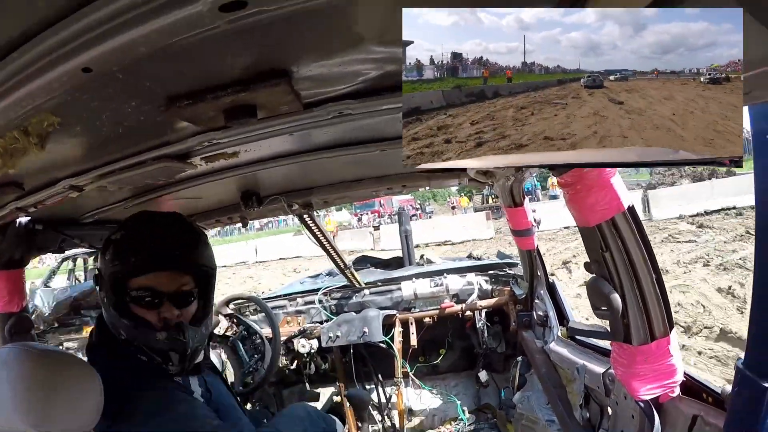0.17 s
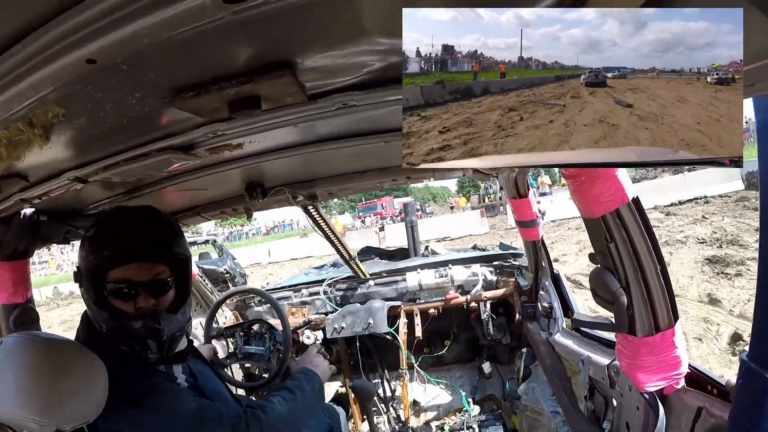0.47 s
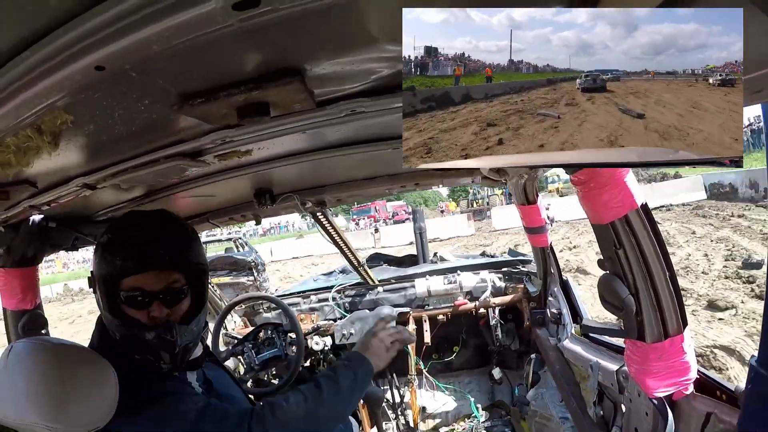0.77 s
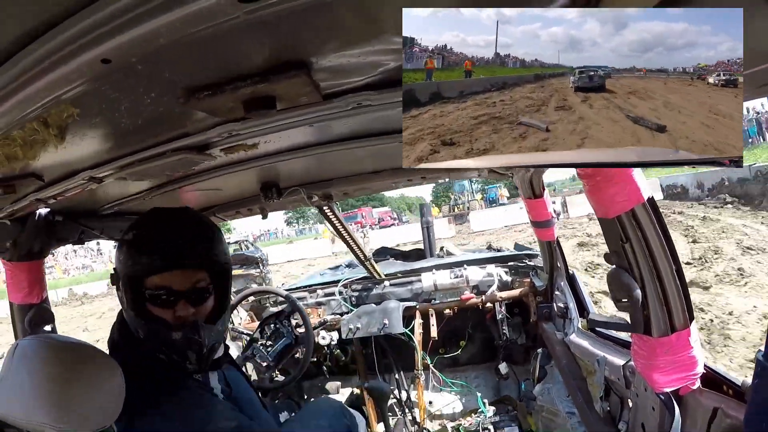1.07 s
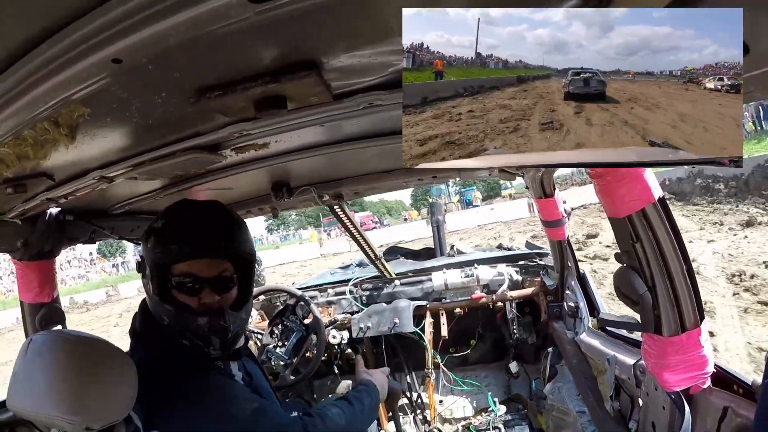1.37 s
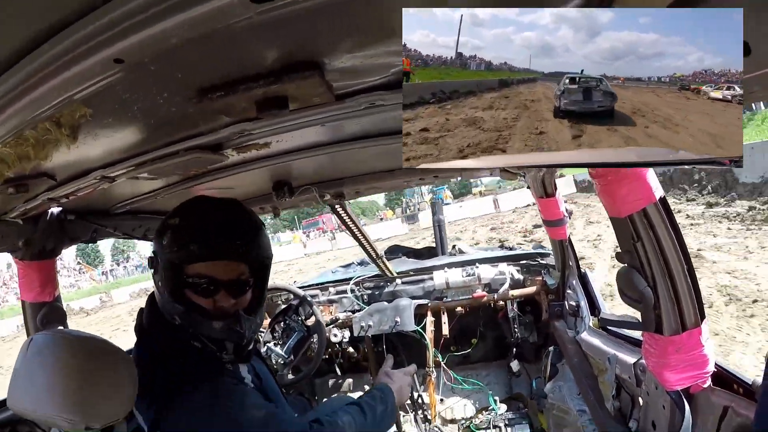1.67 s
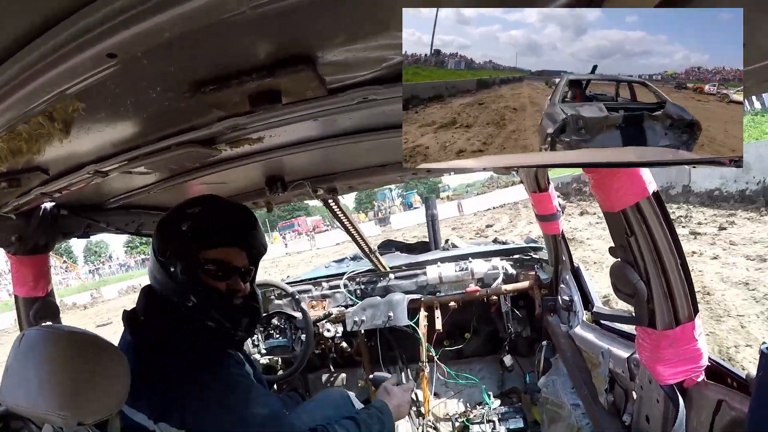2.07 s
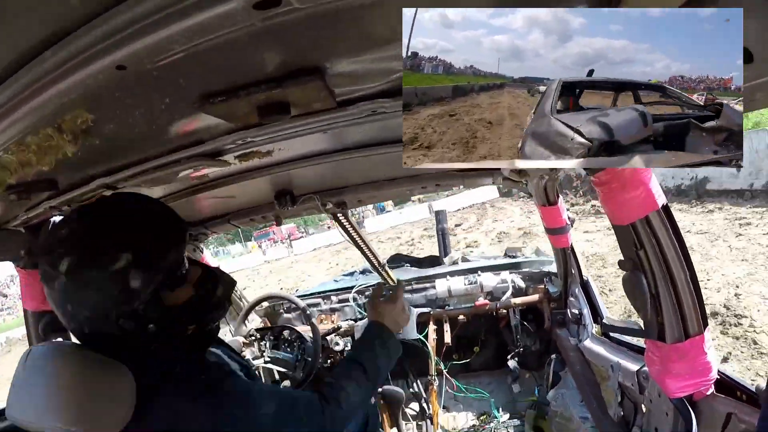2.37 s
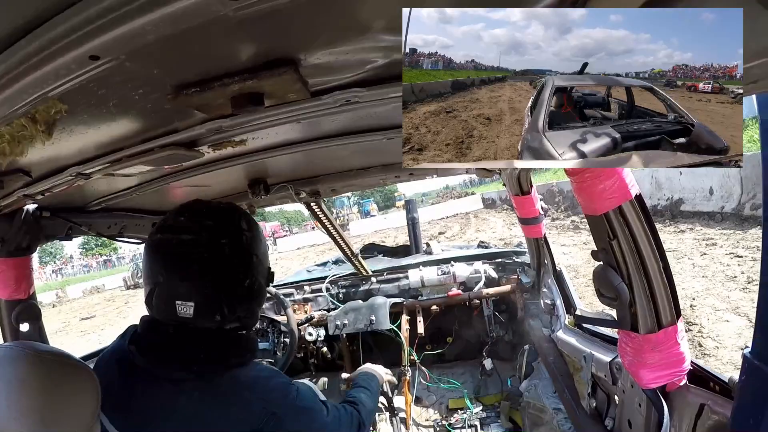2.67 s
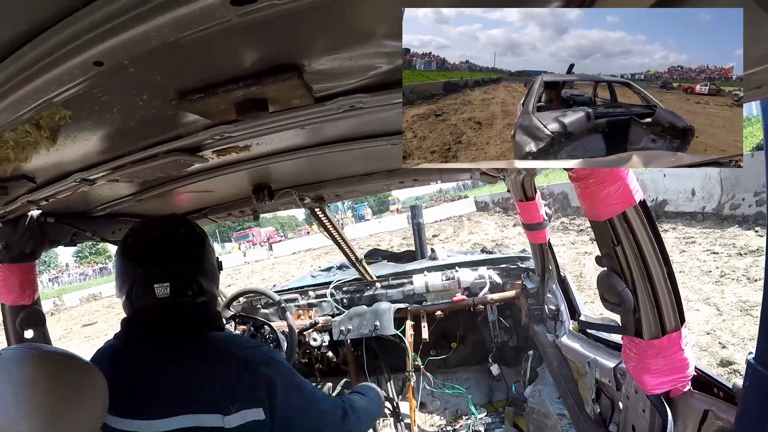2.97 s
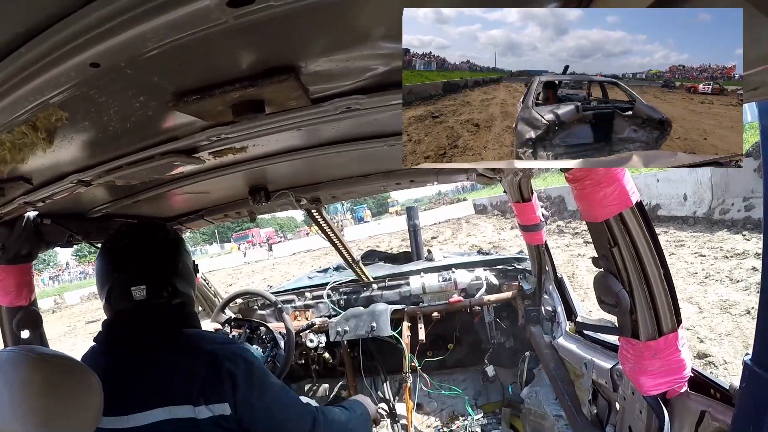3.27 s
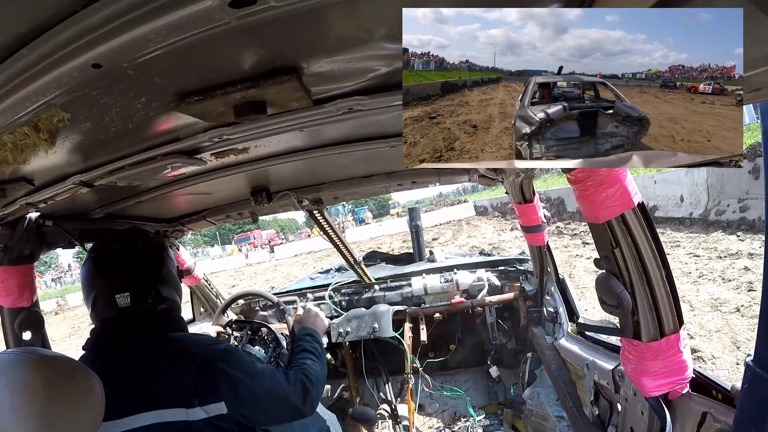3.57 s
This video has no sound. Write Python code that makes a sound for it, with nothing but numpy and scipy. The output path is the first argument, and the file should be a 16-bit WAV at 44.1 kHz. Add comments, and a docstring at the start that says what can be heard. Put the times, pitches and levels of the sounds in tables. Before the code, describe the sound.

A derby car engine revs hard, eases off, then rams another car with a crunching metal crash.

```python
"""Ramming in a stripped derby car

Heard from the cabin on a dirt arena: the engine barks under throttle, eases off, the car rams another
and pulls again. Pulses, pitched orders and puffs of noise on one firing cycle make the engine; orders
alone make two other cars. Filtered noise and random ticks make the booming, rattling shell and dirt.
The crash is decaying bursts of snaps and noise ringing the panels, a low thud, then settling parts."""
import sys
import numpy as np
from scipy import signal
from scipy.fft import rfft, irfft, next_fast_len
from scipy.io import wavfile
from scipy.ndimage import uniform_filter1d, minimum_filter1d, map_coordinates

SR = 44100
rng = np.random.default_rng(int(sys.argv[2]) if len(sys.argv) > 2 else 0)


def wav_record(signal):
    """Record a signal, one row per channel, as 16-bit PCM in the file named by sys.argv[1]."""
    frames = np.transpose(np.atleast_2d(signal))
    bounded = np.clip(frames, -1, 1)
    # unit amplitude maps onto the largest positive 16-bit level
    quanta = np.round(bounded * 32767).astype(np.int16)
    wavfile.write(sys.argv[1], SR, quanta)


N = 163611


def amp(db):
    """Level to gain: 20 dB is a factor of ten in amplitude."""
    return 10 ** (np.asarray(db) / 20)


def unit(x):
    """Normalisation: the signal scaled to rms 1."""
    return x / np.sqrt(np.mean(x ** 2) + 1e-20)


def along(points, hz):
    """Spectral envelope: (f/Hz, value) points joined by lines on a log frequency axis."""
    f, v = np.transpose(points)
    return np.interp(np.log(hz + 1), np.log(f + 1), v)


def curves(rows):
    """Linear interpolation in time: a value per sample for each column after t/s."""
    s, *cols = np.transpose(rows)
    return [np.interp(np.arange(N) / SR, s, c) for c in cols]


def wobble(rate):
    """Slow random modulation: a smooth curve through random knots, rate of them a second."""
    return map_coordinates(rng.standard_normal(2048), [np.arange(N) * rate / SR], mode="wrap")


def filtered(x, response):
    """Linear filtering: the spectrum times a complex response of frequency."""
    m = next_fast_len(N + SR // 2)
    spectrum = rfft(x, m) * response(np.fft.rfftfreq(m, 1 / SR))
    return irfft(spectrum, m)[..., :N]


def coloured(x, points):
    """Minimum-phase filtering: a causal filter with the given (f/Hz, level/dB) shape."""
    size = 16384
    cepstrum = irfft(np.log(amp(along(points, np.fft.rfftfreq(size, 1 / SR)))))
    # folding the cepstrum onto positive times makes the response causal
    cepstrum[1:size // 2] *= 2
    cepstrum[size // 2 + 1:] = 0
    impulse = irfft(np.exp(rfft(cepstrum)))[:size // 2]
    return signal.fftconvolve(x, impulse)[:N]


def resonant(x, modes):
    """Modal resonance: parallel second-order modes of (f/Hz, width/Hz, peak gain/dB)."""
    def response(f):
        return sum(amp(db) * 1j * f * w / (c * c - f * f + 1j * f * w) for c, w, db in modes)
    return filtered(x, response)


def ticks(per_s, spread_db):
    """Random impact process: sparse impulses of uneven size and random sign, rms 1."""
    size = amp(spread_db * np.minimum(rng.exponential(size=N), 4))
    happens = rng.random(N) < per_s / SR
    return unit(happens * size * np.sign(rng.standard_normal(N)))


def orders(hz, table, rough, flutter_hz):
    """Order synthesis: sines at multiples of a pitch curve, each wavering in size and phase."""
    turn = 2 * np.pi * np.cumsum(hz) / SR
    total = 0
    for k, db in table:
        level = amp(db + 2.2 * rough * wobble(flutter_hz))
        phase = k * turn + rng.uniform(0, 2 * np.pi) + rough * k * wobble(flutter_hz)
        total = total + level * np.sin(phase)
    return np.sqrt(2) * total


def bursts(rows):
    """Impact envelope: (t/s, level/dB, T60/s) hits, at once up and exponentially down, summed in power."""
    t = np.arange(N) / SR
    return np.sqrt(sum((t >= s) * amp(db - 60 * np.abs(t - s) / t60) ** 2 for s, db, t60 in rows))


def shell():
    """Forced vibration: ruts shake a deep rumble from the body, with dirt and loose parts clattering."""
    # shaking over the ruts: t/s, rumble level/dB, clatter level/dB
    ground = [(0, -14, -29.5), (.2, -18, -28.5), (.5, -12.5, -27.5), (1.0, -18, -24), (1.5, -15.5, -25.5),
              (1.9, -16.5, -27.5), (2.2, -16.5, -29.5), (2.5, -15.5, -31), (2.8, -15.5, -35),
              (3.1, -17.5, -32.5), (3.4, -22.5, -27.5), (3.71, -12.5, -39.5)]
    # spectrum of the booming body: f/Hz, relative level/dB
    rumble_shape = [(15, -43), (30, -1.5), (48, -1), (65, 9), (82, 8.5), (100, 12), (125, 10.5), (155, 2.5),
                    (190, -0.5), (260, -10.5), (500, -74.5)]
    # spectrum of the loose parts: f/Hz, relative level/dB
    clatter_shape = [(100, -24.5), (220, 3), (450, -0.5), (620, -7), (950, -10.5), (1600, -12),
                     (2500, -18.5), (4500, -33.5), (9000, -70)]
    rumble_db, clatter_db = curves(ground)
    rumble = unit(coloured(rng.standard_normal(N), rumble_shape))
    rattle_share = 0.46  # rms of the ticks against the noise
    strikes = rng.standard_normal(N) + rattle_share * ticks(per_s=600, spread_db=5)
    unsteady = strikes * amp(2.23 * wobble(45))
    clatter = unit(coloured(unsteady, clatter_shape))
    return amp(rumble_db) * rumble + amp(clatter_db) * clatter


def dirt_spray():
    """Dense random impacts: dirt spraying on the steel merges into a wavering hiss."""
    # strength of the spray: t/s, level/dB before wavering
    spray = [(.3, -71), (1.4, -53.5), (1.75, -47), (2.05, -52.5), (2.45, -44.5), (2.75, -52.5),
             (3.2, -52.5), (3.5, -44), (3.71, -45.5)]
    # spectrum of grit on steel: f/Hz, relative level/dB
    grit_shape = [(1000, -20.5), (3000, 22), (5000, 12), (6800, 17.5), (9000, -33.5)]
    spray_db, = curves(spray)
    hiss = unit(coloured(rng.standard_normal(N), grit_shape))
    return amp(spray_db + 3.9 * wobble(15)) * hiss


def shell_groans():
    """Brief tonal vibration: the twisting shell groans in sines under Gaussian swells."""
    # groans of the shell: t/s of the peak, f/Hz, peak level/dB
    groan_list = [(0.064, 570, -31), (0.581, 425, -13), (.925, 470, -18), (.945, 695, -19.5),
                  (1.38, 705, -26), (1.43, 478, -17.5), (1.601, 590, -26), (1.68, 460, -18),
                  (1.77, 455, -18), (1.945, 373.9, -23)]
    width_s = 0.019  # standard deviation of each swell
    t = np.arange(N) / SR
    total = np.zeros(N)
    for s, hz, db in groan_list:
        swell = np.exp(-((t - s) / width_s) ** 2 / 2)
        total += amp(db) * swell * np.sin(2 * np.pi * hz * t + .5 * wobble(70))
    return total


def tyres():
    """Friction noise: tyres scrub as the cars part, a short Gaussian swell of narrow-band noise."""
    centre_s, width_s, level_db = 3.32, 0.14, -53.5  # peak level of the swell
    swell = np.exp(-((np.arange(N) / SR - centre_s) / width_s) ** 2 / 2)
    scrub = unit(resonant(rng.standard_normal(N), [(1430, 400, 0)]))
    return amp(level_db) * swell * scrub


def rival_car():
    """Harmonic radiation: the engine of the car ahead, heard as orders of its firing rate."""
    # engine of the car ahead: t/s, firing rate f/Hz, level/dB
    rival = [(1.3, 61.02, -65), (1.5, 63.06, -29.5), (1.7, 70.5, -33.5), (1.9, 73.84, -32),
             (2.1, 75.39, -35), (2.5, 68.16, -39.5), (2.9, 78.66, -44), (3.5, 82.2, -38.5),
             (3.71, 77.14, -41.5)]
    # its orders: multiple of the firing rate, relative level/dB
    rival_orders = [(2, 13), (3, -20), (4, 2.5), (6, -8), (7, -10.5)]
    hz, level_db = curves(rival)
    return amp(level_db) * orders(hz, rival_orders, rough=.13, flutter_hz=21.76)


def droning_car():
    """Low-order transmission: the nearest other engine booms in the shell, with weaker overtones."""
    # boom of the nearest other engine: t/s, pitch f/Hz, level/dB
    drone = [(0, 88.8, -23), (.08, 94.3, -11.5), (.18, 104.2, -9), (.24, 104, -10), (.28, 101.1, -16),
             (.35, 99.5, -9.5), (.46, 96.6, -24.5), (.8, 110, -22), (1.2, 97.93, -16), (1.36, 113.3, -14.5),
             (1.49, 129.9, -9.5), (1.58, 100.5, -15), (1.7, 106.9, -12.5), (1.82, 120.6, -17.5),
             (2.14, 98.1, -17), (2.26, 116.7, -6.5), (2.38, 112.5, -27.5), (2.55, 103.2, -18),
             (2.78, 120.8, -15), (3.15, 119, -21), (3.3, 115.5, -14), (3.44, 112.1, -8), (3.55, 111, -13),
             (3.71, 109.3, -18.5)]
    # its overtones: multiple of the pitch, level/dB relative to the boom before the edge is added
    overtone_orders = [(1.249, -21), (2, -13), (2.5, -23.5), (3, -23.5), (4, -26)]
    # edge on the overtones: t/s, added level/dB
    edge = [(0, 5), (.15, 1.5), (.4, 5), (1.5, -11), (2.6, -12), (3.2, -13.5), (3.5, -2), (3.71, 4.5)]
    hz, level_db = curves(drone)
    edge_db, = curves(edge)
    boom = orders(hz, [(0.99, 0.0038)], rough=0.069, flutter_hz=34.16)
    overtones = orders(hz, overtone_orders, rough=0.35, flutter_hz=30.16)
    return amp(level_db) * (boom + amp(edge_db) * overtones)


def engine():
    """Periodic excitation: each firing sends a pulse down the exhaust and rasping gas into the shell."""
    # the car's own engine: t/s, firing rate f/Hz
    firing = [(0, 54.8), (.36, 55.41), (.48, 63.5), (.62, 73.1), (.75, 77.73), (.87, 77.73), (1.03, 74.3),
              (1.25, 73.76), (1.38, 70.7), (1.52, 62.81), (1.83, 61.73), (2.2, 56.75), (2.5, 52.08),
              (3.3, 53.8), (3.71, 52.96)]
    # throttle: t/s, exhaust level/dB, rasp level/dB
    throttle = [(0, -25.5, -89.5), (.29, -26, -49.5), (.36, -20.5, -27.5), (.55, -18, -26),
                (.75, -17.5, -23), (1.0, -15, -27), (1.28, -20.5, -27.5), (1.4, -24, -38.5),
                (1.75, -22, -34), (1.88, -24.5, -63.5), (2.2, -22, -40.5), (2.8, -48, -60),
                (3.3, -43.5, -44), (3.53, -35.5, -33.5), (3.71, -33, -24.5)]
    # exhaust heard through the shell: f/Hz, relative level/dB
    exhaust_shape = [(30, -35.5), (75, -8), (155, 10), (228, -4), (300, -7), (445, 10.5), (540, -13.5),
                     (640, -8), (900, -3), (1100, -28), (5000, -66)]
    # spectrum of the rasping gas: f/Hz, relative level/dB
    rasp_shape = [(400, -20), (800, 3.5), (1050, -7), (1600, -2), (2300, -4.5), (2800, -8), (3500, -6.5),
                  (4800, -12.5), (7000, -13.5), (9000, -21.5), (11000, -39), (15000, -27.5)]
    # pipe resonances: f/Hz, width/Hz, relative gain/dB
    pipe_modes = [(905, 17, 7), (1593, 54, 3.5), (2219, 65, 3.5), (2463, 30, -5.5), (3080, 220, -17)]
    # clean orders: multiple of the firing rate, relative level/dB
    clean_orders = [(1, 2), (1.5, -4), (2, -1), (3, -1.5), (5, -7), (6, -5), (7, -11.5), (8, -12),
                    (9, -12.5), (12, -10), (2.5, -16.5), (5.5, -12.5), (8.5, -10)]
    cylinder_swing, firing_scatter_db, jitter_s = 0.24, 1, .00006
    puff_decay, puff_floor, puff_scatter_db = .24, .5, 1.2  # decay to 1/e in firing cycles
    crack_decay, crack_scatter_db, crack_db = .17, 1, -2.5  # decay to 1/e in firing cycles
    surge_db, surge_hz = 2.27, 35.56  # uneven burning
    ring_from_hz, ring_full_hz = 43, 61.8  # firing rates over which the puffs start to ring the pipe

    hz, = curves(firing)
    exhaust_db, rasp_db = curves(throttle)
    cycle = np.cumsum(hz * (1 + 0.0024 * wobble(25))) / SR
    index = cycle.astype(int)
    since_firing = cycle % 1
    at = np.flatnonzero(np.diff(index))
    # one row a firing: lateness, pulse size, puff size
    chance = rng.standard_normal((512, 3))
    # alternate firings are stronger and weaker
    swing = 1 + cylinder_swing * (-1) ** np.arange(len(chance))

    pulses = np.zeros(N)
    late = (jitter_s * SR * chance[:len(at), 0]).astype(int)
    pulse_size = swing * amp(firing_scatter_db * chance[:, 1])
    pulses[np.clip(at + late, 0, N - 1)] = pulse_size[:len(at)]
    exhaust = unit(coloured(pulses - pulses.mean(), exhaust_shape))

    # decaying puffs over a steady hiss
    puff_size = swing * amp(puff_scatter_db * chance[:, 2])
    puff = np.exp(-since_firing / puff_decay) * puff_size[index]
    flow = (puff + puff_floor) * amp(surge_db * wobble(surge_hz))
    gas = coloured(flow * rng.standard_normal(N), rasp_shape)

    # the steep front of each puff cracks against the pipe's resonances
    front = np.exp(-since_firing / crack_decay) * amp(crack_scatter_db * chance[:, 2])[index]
    ring = resonant(coloured(front * rng.standard_normal(N), rasp_shape), pipe_modes)
    ringing = np.clip((hz - ring_from_hz) / (ring_full_hz - ring_from_hz), 0, 1)
    rasp = unit(unit(gas) + amp(crack_db) * ringing * unit(ring))

    # the clean orders strengthen with the ringing
    tone = (0.48 + 0.54 * ringing) * orders(hz, clean_orders, rough=0.2, flutter_hz=22)
    pipe = amp(-4.0) * exhaust + amp(-7.5) * tone
    return amp(exhaust_db) * pipe + amp(rasp_db) * rasp


def pops():
    """Impulsive discharge: near full revs a few firings crack hard, as decaying bursts of band noise."""
    # hard cracks in the exhaust: t/s, relative level/dB
    pop_list = [(1.045, -22), (1.14, -18), (1.221, -19.5), (1.248, -16.5)]
    band = [(1850, 700, 0)]
    push = bursts([(s, db, .045) for s, db in pop_list])  # T60 of .045 s
    # two passes steepen the skirts of the band
    crack = resonant(resonant(push * rng.standard_normal(N), band), band)
    return np.std(push) * unit(crack)


def buckling_metal():
    """Impact excitation: hard blows crush the panels in dense snaps and noise, light ones rattle them."""
    # blows on the bodywork: t/s, relative level/dB, T60/s
    blows = [(1.938, -25.5, .16), (2.241, -6.5, .19), (2.261, -11, .17), (2.277, -11.5, .17),
             (2.302, -14, .16), (2.328, -21, .1), (2.354, -20.5, .26), (2.389, -23.5, .13),
             (2.422, -23, .15), (2.498, -28, .22), (2.6, -31, .1), (3.684, -20, .06)]
    # spectrum of crumpling sheet metal: f/Hz, relative level/dB
    crumple_shape = [(100, -18), (220, 6), (450, -3), (900, -2), (1300, -7), (1900, -7), (3200, -13.5),
                     (4600, -21), (7000, -23.5), (11000, -41), (16000, -50.5)]
    # ringing of the struck panels: f/Hz, relative gain/dB
    panel = [(425, 7), (694, -0.5), (1020, 0), (1360, -1), (1700, 6.5), (2120, 1), (3130, -1.5)]
    panel_width_hz, panel_db = 63, -9.5
    force = bursts(blows)
    # harder blows have a larger share of noise among the snaps
    crush = 1.8 * np.sqrt(force / force.max())
    mixture = ticks(per_s=1200, spread_db=-0.5) + crush * rng.standard_normal(N)
    snaps = force * mixture / np.hypot(1, crush)
    crunch = unit(coloured(snaps, crumple_shape))
    ring = unit(resonant(crunch, [(hz, panel_width_hz, db) for hz, db in panel]))
    return np.std(force) * unit(crunch + amp(panel_db) * ring)


def body_thud():
    """Damped oscillation: the main blow starts one low sine that decays exponentially."""
    start_s, hz, level_db, t60_s = 2.243, 83.6, -0.5, 0.26
    age = np.maximum(np.arange(N) / SR - start_s, 0)
    return amp(level_db - 60 * age / t60_s) * np.sin(2 * np.pi * hz * age)


def scene():
    """Superposition: all sources in the cabin, nearly mono, with a little diffuse width."""
    # diffuse width: f/Hz, side level/dB
    side_shape = [(100, -74), (250, -73), (500, -28.5), (1000, -18.5), (6000, -34.5), (14000, 1)]
    background = shell() + dirt_spray() + shell_groans() + tyres() + rival_car() + droning_car()
    mid = background + engine() + pops() + buckling_metal() + body_thud()
    t = np.arange(SR // 20) / SR
    tail = rng.standard_normal(len(t)) * amp(-60 * t / .05)
    diffuse = signal.fftconvolve(mid, tail / np.linalg.norm(tail))[:N]
    side = coloured(diffuse, side_shape)
    # the treble leans slightly to the right
    lean = filtered(mid, lambda hz: along([(250, 0), (1000, -0.0046), (6000, -0.062)], hz))
    return np.array([mid + side + lean, mid - side - lean])


def record(dry):
    """Peak limiting and band limiting: one smoothed gain holds both channels, then the top is cut."""
    ceiling_db, top_hz = -.6, 15400
    need = np.minimum(1, amp(ceiling_db) / (np.abs(dry).max(axis=0) + 1e-9))
    gain = uniform_filter1d(minimum_filter1d(need, size=600), size=600)
    return filtered(dry * gain, lambda hz: hz < top_hz)


dry = scene()
out = record(dry)
wav_record(out)
```